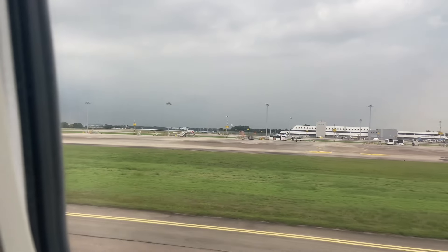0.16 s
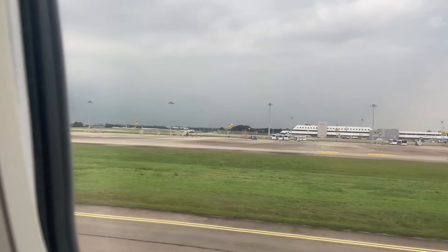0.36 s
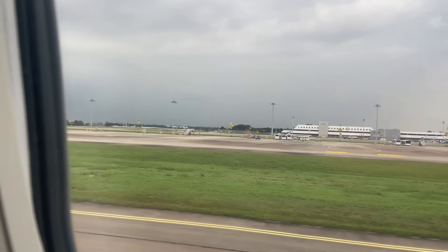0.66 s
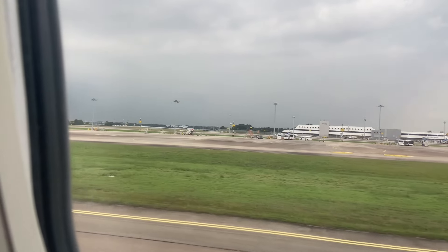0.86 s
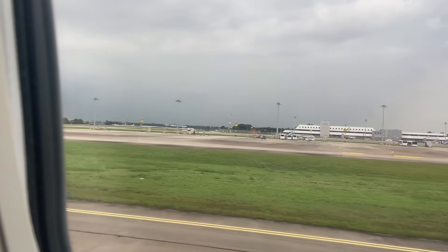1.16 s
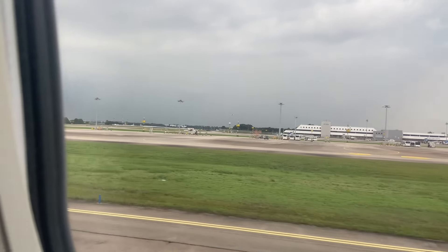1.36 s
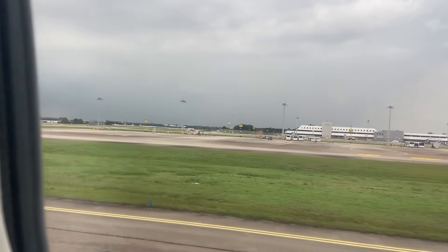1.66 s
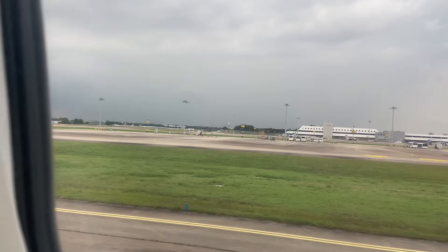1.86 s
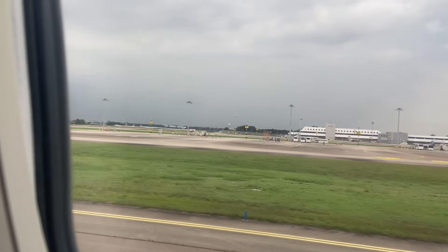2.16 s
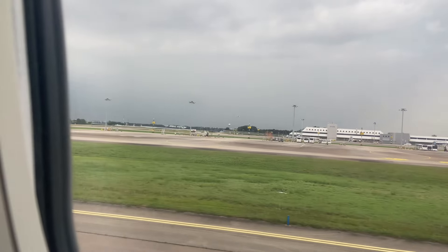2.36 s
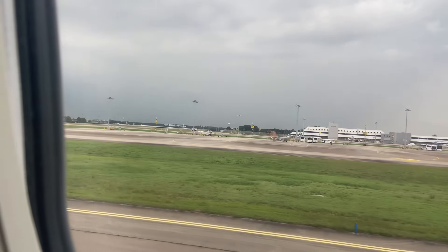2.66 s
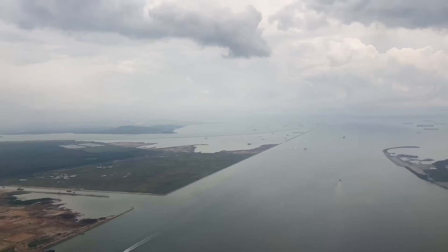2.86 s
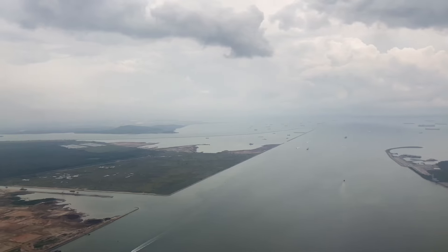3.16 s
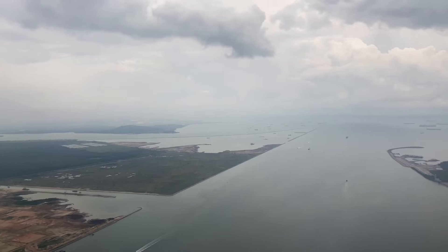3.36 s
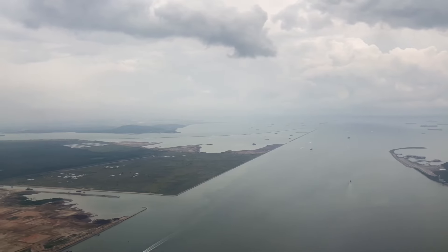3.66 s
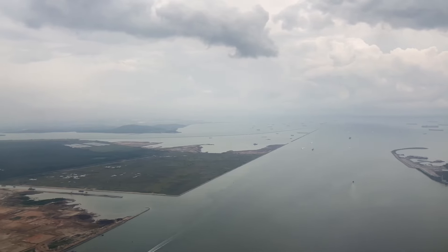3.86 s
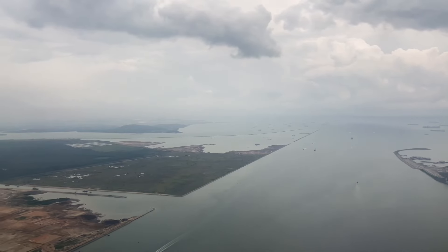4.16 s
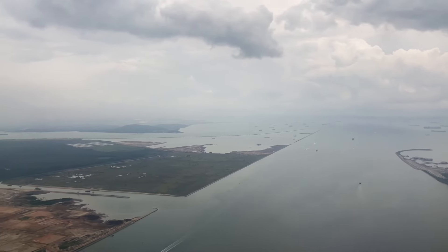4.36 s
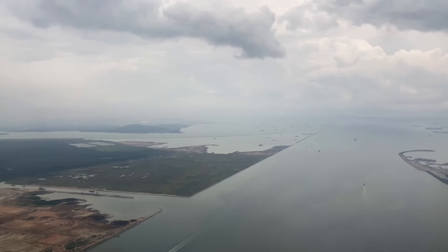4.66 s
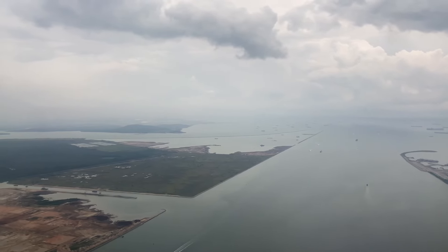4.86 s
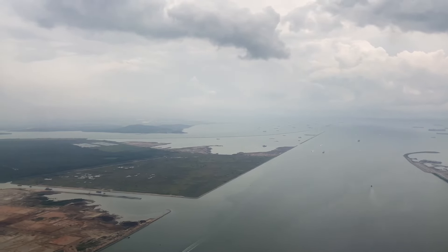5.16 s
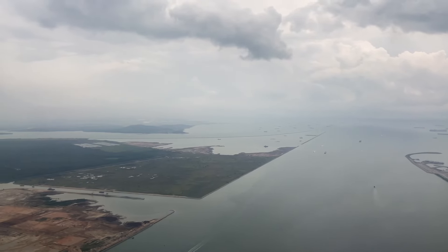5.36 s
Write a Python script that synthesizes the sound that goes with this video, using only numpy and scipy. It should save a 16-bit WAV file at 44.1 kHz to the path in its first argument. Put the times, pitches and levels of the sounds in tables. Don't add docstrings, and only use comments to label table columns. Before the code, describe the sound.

Deep booming jet rumble inside an airliner cabin with small trim ticks, then an abrupt cut to a louder, roaring, buzzing climb.

```python
import sys
import numpy as np
from scipy import signal
from scipy.fft import rfft, irfft, next_fast_len
from scipy.io import wavfile
from scipy.ndimage import uniform_filter1d, minimum_filter1d

SR = 44100
rng = np.random.default_rng(int(sys.argv[2]) if len(sys.argv) > 2 else 0)


def decibels_to_gain(level_db):
    exponent = np.asarray(level_db, float) / 20
    return 10 ** exponent


def to_wav(sig):
    pcm = np.clip(np.atleast_2d(sig), -1, 1) * 32767
    pcm = np.round(pcm).astype(np.int16)
    wavfile.write(sys.argv[1], SR, pcm.T)


N = 242550

# shaft order, left level in dB, right level in dB, right lead in rad.
STRONG_ORDERS = [(1, -17, -18, 0.2), (2, -28, -25, 0.7), (3, -29, -31, 0.4), (4, -29, -29, -0.4),
                 (5, -38, -36, 0.3), (7, -43, -46, -0.6), (8, -43, -41, 0.8), (9, -40, -40, 2.7),
                 (10, -55, -46, 3.1), (11, -50, -45, -1.9), (12, -46, -58, -1.7), (13, -45, -49, -1.8),
                 (17, -56, -53, -2.9), (20, -62, -53, -2.1), (22, -57, -56, 3.0), (24, -49, -42, -3.0),
                 (33, -57, -55, 3.0), (35, -52, -54, 3.1), (36, -53, -56, 2.4), (48, -59, -71, -0.2),
                 (49, -58, -64, 0), (58, -63, -66, 0), (62, -70, -65, 0.1), (65, -62, -74, -1.8),
                 (75, -63, -72, -0.8), (79, -61, -65, 1.9), (14, -58, -54, -2.7), (34, -62, -56, 1.9),
                 (47, -59, -71, 1.3), (68, -59, -71, 1.3)]


def evened(x):
    return x / np.sqrt(np.mean(x ** 2) + 1e-20)


def read(points, hz):
    f, value = np.transpose(points)
    return np.interp(np.log(hz + 1), np.log(f + 1), value)


def white(size):
    return rfft(rng.standard_normal(size))


def ports(mid, side):
    return np.array([mid + side, mid - side])


def hull_spectrum(hz, size, mid, side, modes, balance, side_db, lead):
    # frequency in Hz, factor (right first 1, left first -1).
    first_port = [(230, 1), (380, -.6), (1000, -.6), (1350, .3), (1900, .2), (2600, -.3), (3600, 0)]
    lift_db = sum(peak_db / (1 + (2 * (hz - f) / width_hz) ** 2) for f, width_hz, peak_db in modes)
    common, other = white(size), white(size)
    share = np.clip(lead, 0, 1) * read(first_port, hz)
    apart = -1j * share * common + np.sqrt(1 - share ** 2) * other
    mid_z = common * decibels_to_gain(read(mid, hz) + lift_db)
    side_z = apart * decibels_to_gain(read(side, hz) + .6 * lift_db + side_db)
    z = ports(mid_z, side_z) * decibels_to_gain(np.outer([.5, -.5], read(balance, hz)))
    mic_bass_cut = 1 + (38 / (hz + 1)) ** 3
    hull_top_cut = 1 + (hz / 8200) ** 12
    return z / mic_bass_cut / hull_top_cut


def hull(loudness_points, layers, **colour):
    size = next_fast_len(N)
    hz, t = np.fft.rfftfreq(size, 1 / SR), np.arange(N) / SR
    z = hull_spectrum(hz, size, **colour)
    s, loudness_db = np.transpose(loudness_points)
    swell_db = np.interp(t, s, loudness_db - loudness_db.mean())
    edges_hz, steady = (0, 95, 420, SR), (.4, .2, .15)
    out = np.zeros((2, N))
    for lo, hi, (level_db, follow), hold in zip(edges_hz, edges_hz[1:], layers, steady):
        layer = irfft(z * ((hz >= lo) & (hz < hi)), size)[:, :N]
        layer = layer / np.sqrt(np.mean(layer.mean(0) ** 2))
        own_power = uniform_filter1d(uniform_filter1d(layer.mean(0) ** 2, 2600), 2600)
        held = layer * (own_power + 0.01) ** (-hold / 2)
        out += held * decibels_to_gain(level_db + follow * swell_db)
    return out


def roll_hull():
    # time in seconds, loudness in dB.
    roll_loudness = [
        (0, -19.5),
        (.3, -20),
        (.65, -20.5),
        (1.1, -19),
        (1.6, -21.5),
        (1.95, -19.5),
        (2.2, -21),
        (2.4, -20.5),
        (2.72, -20.5),
    ]
    # level in dB at mean loudness, share of the swell.
    roll_layers = [(-17.5, 2.47), (-21.5, 0.24), (-37.5, 0.11)]
    # frequency in Hz, density in dB per Hz.
    roll_mid = [(12, -69), (20, -11), (44, -7.5), (66, 0), (94, -13), (239, -14), (308, -21), (341, -15),
                (407, -31.5), (439, -30.5), (538, -40.5), (748, -43), (1070, -50), (2110, -50), (8500, -69),
                (11000, -60), (18700, -120)]
    # frequency in Hz, density in dB per Hz.
    roll_side = [(12, -60), (20, -43.5), (54, 3), (91, -10.5), (152, -6), (200, -9), (300, -7.5),
                 (387, -11.5), (474, -16.5), (610, -16.5), (1210, -31), (1440, -26), (1860, -31.5),
                 (3420, -36.5), (8500, -53), (11000, -90), (18700, -120)]
    # frequency in Hz, width in Hz, lift in dB.
    roll_modes = [(59, 38, 8.5), (240, 120, 2.5), (354, 39, -1.5), (760, 41, 5.5), (986, 47, 10.5),
                  (1614, 25, 8.5), (2090, 150, 5), (2730, 20, 11), (483.5, 63, 4.5), (3990, 370, 4),
                  (5293, 20, 10), (6481, 10, 9), (5530, 10, 7)]
    # frequency in Hz, left minus right in dB.
    roll_balance = [(60, 0.0), (110, 0.0), (200, 0.0), (380, -0.5), (700, 1.0), (1290, -0.5), (2380, -1.5),
                    (4400, 0.0), (8120, 0.5), (15000, 0.0)]
    return hull(roll_loudness, roll_layers, mid=roll_mid, side=roll_side, modes=roll_modes,
                balance=roll_balance, side_db=-18.5, lead=0.97)


def hiss(level_db):
    # frequency in Hz, density in dB per Hz.
    hiss_curve = [(6000, -33), (7500, -23), (9200, 5), (11200, -3.5), (13200, -5), (15000, -13.5),
                  (15800, -15)]
    lag_s, agree_hz, loose = .00025, 11200, .2
    size = next_fast_len(N)
    hz = np.fft.rfftfreq(size, 1 / SR)
    half_lag = np.exp(1j * np.pi * (hz - agree_hz) * lag_s)
    common = white(size)
    left = common / half_lag + loose * white(size)
    right = common * half_lag + loose * white(size)
    z = np.array([left, right]) * decibels_to_gain(read(hiss_curve, hz)) * (hz > 6000)
    return decibels_to_gain(level_db) * evened(irfft(z, size)[:, :N])


def ticks():
    # start in seconds, peak in dB, centre in Hz, width in Hz, decay in seconds.
    trim_ticks = [
        (.338, -40, 5200, 1500, .003),
        (.421, -53, 11000, 900, .006),
        (1.1076, -29, 760, 500, 0.0033),
        (1.191, -33, 8160, 7500, 0.002),
        (1.229, -39, 4800, 1800, .003),
    ]
    out, t = np.zeros((2, N)), np.arange(1500) / SR
    for start_s, peak_db, centre_hz, width_hz, decay_s in trim_ticks:
        band_hz = [centre_hz - width_hz / 2, centre_hz + width_hz / 2]
        band = signal.butter(3, band_hz, "band", fs=SR, output="sos")
        mid, side = rng.standard_normal((2, len(t))) * [[1], [.5]]
        snap = signal.sosfilt(band, ports(mid, side) * np.exp(-t / decay_s))
        out[:, round(start_s * SR):][:, :len(t)] += decibels_to_gain(peak_db) * snap / abs(snap).max()
    return out


def climb_hull():
    # time in seconds, loudness in dB.
    climb_loudness = [
        (2.75, -14),
        (3.2, -13),
        (3.6, -14.5),
        (4.1, -12.5),
        (4.5, -14),
        (4.9, -12.5),
        (5.07, -16.5),
        (5.25, -13.5),
        (5.5, -14),
    ]
    # level in dB at mean loudness, share of the swell.
    climb_layers = [(-15, 1.1), (-14, 0.56), (-35, 0.13)]
    # frequency in Hz, density in dB per Hz.
    climb_mid = [(12, -59.5), (20, -47.5), (40, -4.5), (71, 1), (177, -9), (227, -10), (265, -15.5),
                 (300, -14), (439, -27.5), (595, -34.5), (642, -39.5), (827, -39.5), (1340, -49),
                 (1860, -47.5), (8500, -62), (11000, -70), (18700, -120)]
    # frequency in Hz, density in dB per Hz.
    climb_side = [(12, -61), (20, -27.5), (109, 4), (200, -11.5), (239, -4.5), (265, -5), (308, -14.5),
                  (407, -17), (676, -24.5), (1120, -35), (1860, -33.5), (2220, -41), (2650, -37),
                  (3010, -42.5), (8500, -53.5), (11000, -91), (18700, -120)]
    # frequency in Hz, width in Hz, lift in dB.
    climb_modes = [(60.4, 37, 11), (128.3, 11.5, 6.2), (245, 92, 1.63), (337, 12, 4.1), (1170, 80, 7.6),
                   (1557, 80, 4.8), (1974, 140, 8.3), (3380, 120, 3.2), (2166, 78, 7.8), (3900, 1000, 2)]
    # frequency in Hz, left minus right in dB.
    climb_balance = [(60, 0.5), (110, 0.0), (200, 0.5), (380, -0.5), (700, 1.0), (1290, 0.0), (2380, -1.5),
                     (4400, 4.0), (8120, 1.5), (15000, 0.0)]
    return hull(climb_loudness, climb_layers, mid=climb_mid, side=climb_side, modes=climb_modes,
                balance=climb_balance, side_db=-11, lead=0.58)


def tone(turns, left_db, right_db, lead_rad, waver_db):
    start_rad, at = 2 * np.pi * rng.random(), np.arange(len(turns))
    waver = decibels_to_gain(waver_db * rng.uniform(-1, 1, 12))
    drift = np.interp(at, np.linspace(0, len(at), 12), waver)
    wave = np.sin(2 * np.pi * turns + start_rad + np.array([[0], [lead_rad]]))
    return np.sqrt(2) * decibels_to_gain([[left_db], [right_db]]) * drift * wave


def faint_orders():
    top_order, scatter_db = 92, 6
    order = np.setdiff1d(np.arange(14, top_order), [row[0] for row in STRONG_ORDERS])
    left, right, lead = rng.uniform(-1.1, 1, (top_order, 3))[order].T
    left_db = -65 - .08 * order
    right_db = left_db - 5
    return zip(order, left_db + scatter_db * left, right_db + scatter_db * right, np.pi * lead)


def fan(t):
    # time in seconds, speed in turns per second.
    shaft_speed = [(2.73, 75.484), (5.5, 75.151)]
    turns = np.cumsum(np.interp(t, *np.transpose(shaft_speed))) / SR
    orders = [*STRONG_ORDERS, *faint_orders()]
    return sum(tone(order * turns, *rest, waver_db=5.5) for order, *rest in orders)


def whines(t):
    # frequency in Hz, left level in dB, right level in dB, right lead in rad.
    accessory_lines = [(547, -37, -42, 2.4), (1475, -58, -55, 2.1), (1483, -53, -50, 2.1),
                       (2934, -62, -64, 1.1)]
    return sum(tone(line_hz * t, *rest, waver_db=2.5) for line_hz, *rest in accessory_lines)


def entered(x, value):
    t = np.arange(x.shape[1]) / SR
    return x + (value - x[:, 0])[:, None] * np.exp(-(t / 0.0022) ** 2)


def scene():
    cut = round(2.73312 * SR)
    first, jump, last = (.195, .25), (-.48, -.41), (-.28, -.335)
    roll = roll_hull() + hiss(level_db=-65.5) + ticks()
    climb = climb_hull() + hiss(level_db=-58.5)
    t = np.arange(cut, N) / SR
    climb = climb[:, cut:] + fan(t) + whines(t)
    climb = entered(climb, roll[:, cut - 1] + jump)
    climb = entered(climb[:, ::-1], last)[:, ::-1]
    return np.hstack([entered(roll, first)[:, :cut], climb])


def low_pass(x):
    return signal.sosfilt(signal.butter(12, 15760, fs=SR, output="sos"), x)


def record(dry):
    bass = signal.sosfiltfilt(signal.butter(2, 450, fs=SR, output="sos"), dry)
    room = np.minimum(.9 / (abs(dry).max(0) + 1e-9), 1)
    gain = uniform_filter1d(uniform_filter1d(minimum_filter1d(room, 801), 401), 401)
    return low_pass(dry - (1 - gain) * bass)


dry = scene()
out = record(dry)
to_wav(out)
```